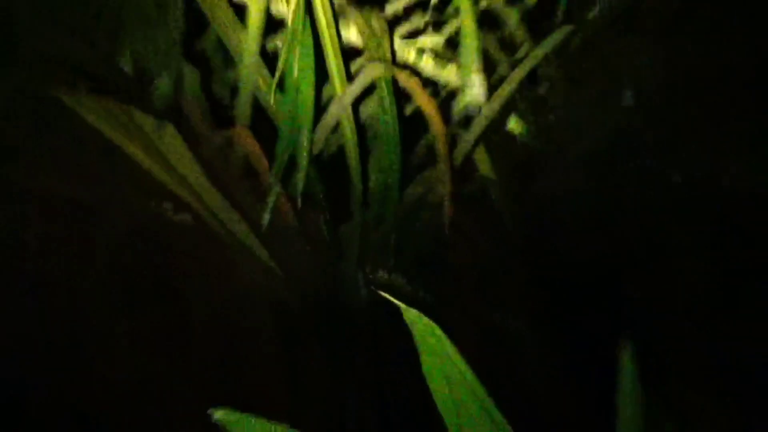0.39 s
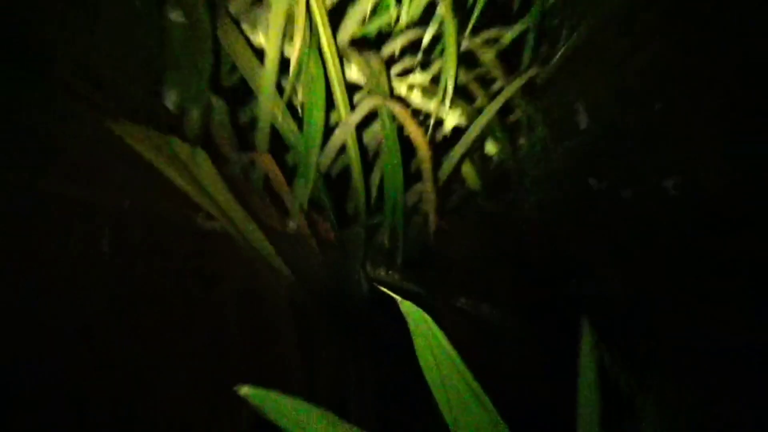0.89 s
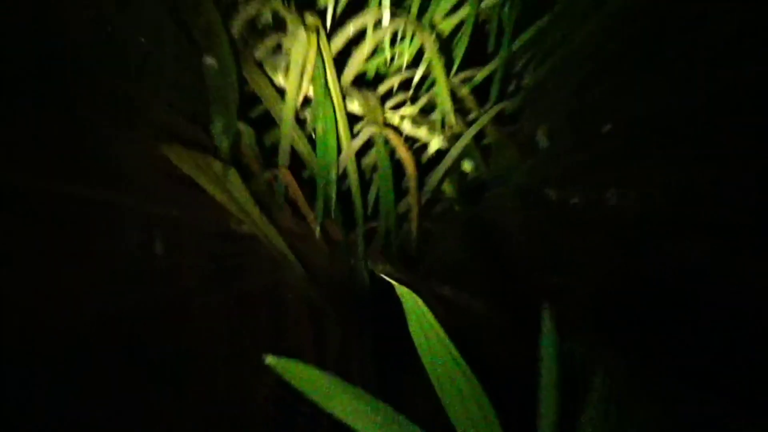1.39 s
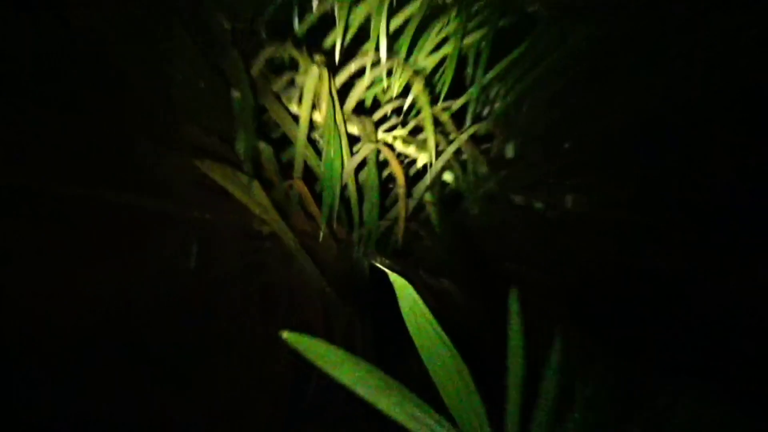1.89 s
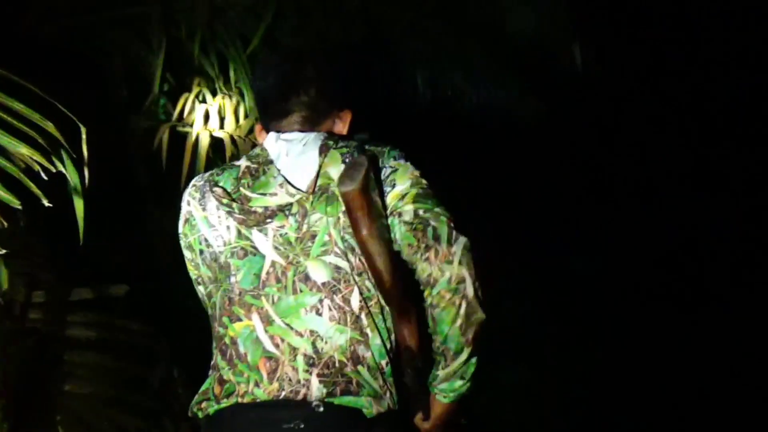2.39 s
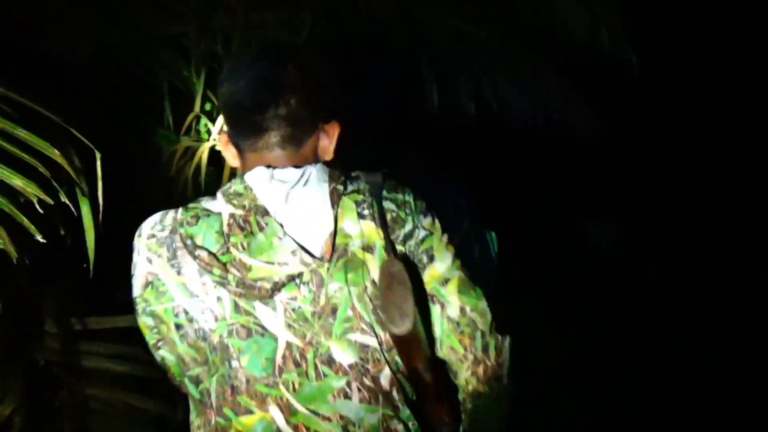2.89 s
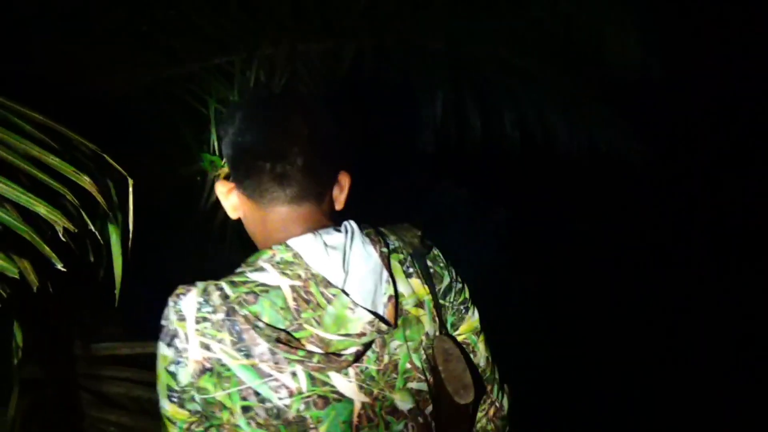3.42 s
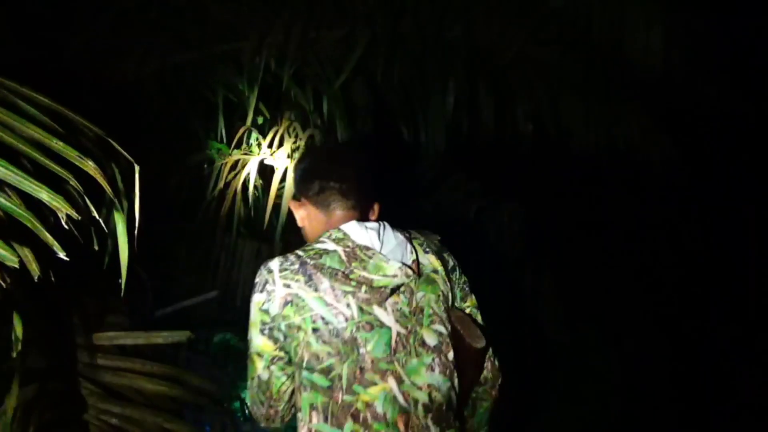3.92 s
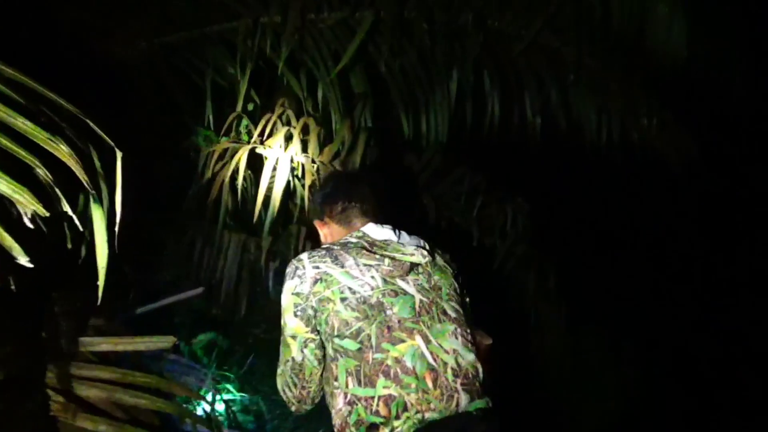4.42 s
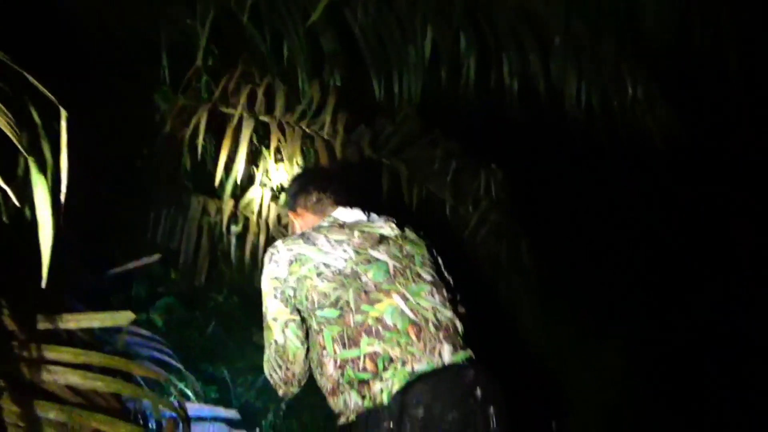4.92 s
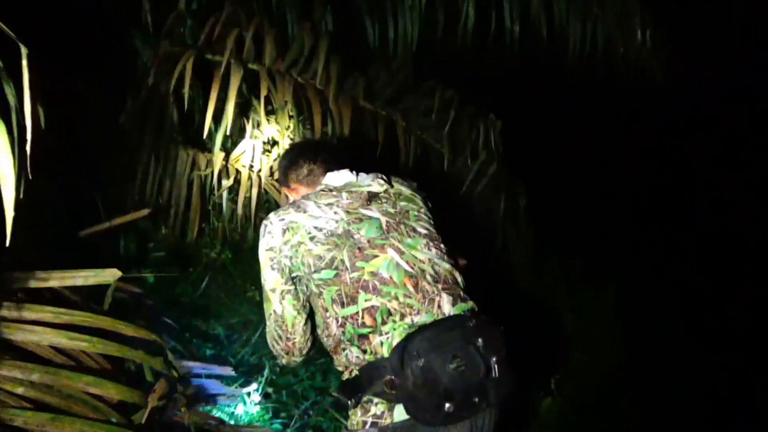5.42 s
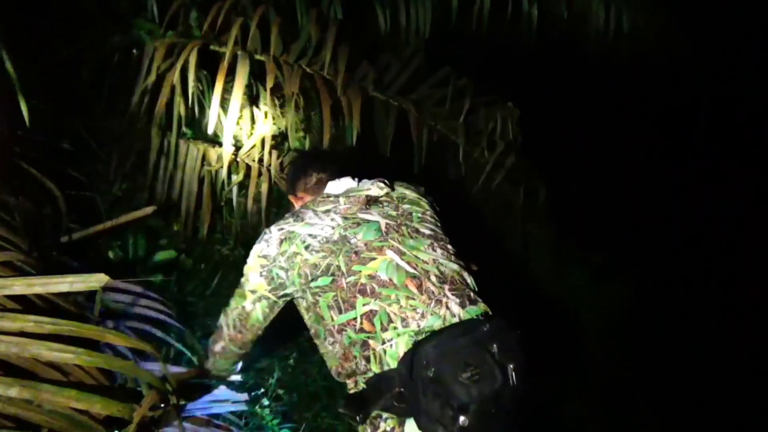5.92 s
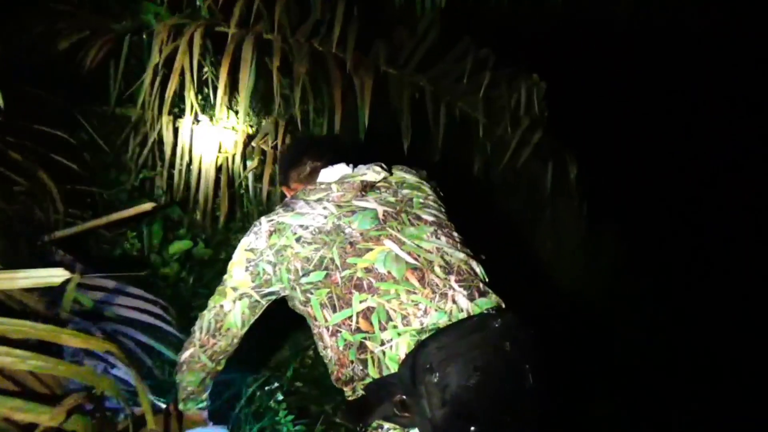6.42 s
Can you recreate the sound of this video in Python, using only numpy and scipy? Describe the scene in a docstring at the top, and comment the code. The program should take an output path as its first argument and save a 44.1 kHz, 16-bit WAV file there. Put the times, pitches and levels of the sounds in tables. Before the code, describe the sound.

A quiet spot in night foliage: faint insect bands, regular sliding trills about three per second, a light leaf swipe. Then a quick change to a loud, shrill insect chorus with steady chirps, quick lower strokes and brief raspy katydid buzzes. Someone moving through fronds makes gritty rustles and woody clicks, with low bumps on the close handheld stereo microphone.

```python
"""Night in a plantation, first from a quiet spot: banded noise for hiss and chorus, a bush cricket trilling in
short sliding tones, faint bumps, two katydid buzzes (harmonics of a tooth rate), then two rough falling calls.
After two seconds a much louder spot fades in: denser noise beds, crickets chirping as gated, resonant noise,
and short katydid bursts to the end. Gritty noise brushes through leaves close by; damped ringing modes knock
and a few low swings bump the stereo microphone."""
import sys
import numpy as np
from scipy import signal
from scipy.fft import rfft, irfft
from scipy.io import wavfile
from scipy.ndimage import uniform_filter1d

SR = 44100
rng = np.random.default_rng(int(sys.argv[2]) if len(sys.argv) > 2 else 0)


def ratio(d):
    """dB to gain"""
    e = np.asarray(d, float) / 20
    return 10 ** e


def unload_audio(sound):
    """Save the sound as a 16-bit wav file, at the path given as the first command line argument."""
    columns = np.transpose(np.atleast_2d(sound))
    # keep every value between -1 and 1, then stretch to whole-number steps
    steps = np.round(np.clip(columns, -1, 1) * 32767)
    wavfile.write(sys.argv[1], SR, steps.astype(np.int16))


N = 289296
T = np.arange(N) / SR
BIN_HZ = np.arange(N // 2 + 1) * SR / N


def unit(x):
    """Scale to rms 1."""
    return x / np.sqrt(np.mean(x ** 2))


def over_hz(table):
    """Gain at every spectrum bin, drawn through (Hz, dB) points on a log pitch axis."""
    hz, db = np.transpose(table)
    return ratio(np.interp(np.log(BIN_HZ + 1), np.log(hz), db))


def on_curve(rows):
    """Gain over time through (s, dB) rows, all but silent outside them."""
    s, db = np.transpose(rows)
    return ratio(np.interp(T, s, db, left=-99, right=-99))


def swells(rows):
    """Gain over time of bell-shaped (middle s, half length s, dB) rows."""
    return sum(ratio(db) * np.exp(-((T - middle) / half) ** 2) for middle, half, db in rows)


def even_run(first, count, gap, db, step_db, scatter_db):
    """(s, dB) rows of evenly spaced sounds, stepping in level and each a little louder or softer."""
    sizes = rng.standard_normal(count)
    return [(first + k * gap, db + k * step_db + scatter_db * size) for k, size in enumerate(sizes)]


def walk(rate):
    """Slow random wander, spread 1, with about `rate` fresh values a second."""
    k = int(SR / rate)
    steps = np.repeat(rng.standard_normal(N // k + 1), k)
    return unit(uniform_filter1d(uniform_filter1d(steps, k), k)[:N])


def wing(x, hz, width_hz):
    """A wing as a steep resonance: one damped mode passed three times, at rms 1."""
    off = (BIN_HZ - hz) / width_hz
    return unit(irfft(rfft(x) / (1 + 2j * off) ** 3, N))


# Side against mid of wide sounds. Each row: pitch in Hz, gain of the side in dB.
SIDE_GAIN = [(60, -24.5), (190, -10.5), (500, -3), (1100, -4.5), (3600, -9), (6500, -7.5), (11000, -13)]


def wide(mid, side):
    """Left and right from two unrelated sounds, the side shaped over pitch."""
    return mid + irfft(rfft(side) * over_hz(SIDE_GAIN), N) * np.array([[1], [-1]])


def panned(x, pan_db):
    """Place a sound by its level, left minus right in dB."""
    return x * ratio(np.array([[pan_db], [-pan_db]]) / 2)


def foliage(x, wet_db, t60):
    """Direct sound plus a decaying scatter from trunks and fronds, partly different at each ear."""
    t = T[:SR // 2]
    shared, left, right = rng.standard_normal((3, len(t))) * np.exp(-np.log(1000) * t / t60)
    tail = shared + 0.28 * np.array([left, right])
    tail = tail * ratio(wet_db) / np.sqrt(np.sum(tail ** 2, axis=1, keepdims=True))
    return x + signal.fftconvolve(x, tail, axes=1)[:, :N]


def air(shape, db, patchy_db):
    """Hiss of the night; countless faint singers come and go, so it is patchy in time and pitch."""
    pair = [irfft(rfft(rng.standard_normal(N)) * over_hz(shape), N) for _ in range(2)]
    cells = signal.stft(np.array(pair), nperseg=512)[2]
    patches = rng.standard_normal(cells.shape[1:])
    patches = uniform_filter1d(patches, size=2, axis=0)  # over pitch
    patches = unit(uniform_filter1d(patches, size=18, axis=1))  # over time
    mid, side = signal.istft(cells * ratio(patchy_db * patches), nperseg=512)[1][:, :N]
    return ratio(db) * unit(wide(mid, side))


def chorus(rows):
    """Far singers as bands of wing-filtered noise, each throbbing at a wandering rate and level."""
    out = 0
    for hz, width_hz, pulse_hz, db in rows:
        pair = []
        for _ in range(2):
            beat = np.cumsum(pulse_hz * (1 + .15 * walk(3))) / SR
            wander = ratio(0.4 * walk(11) + 0.27 * walk(1.906))
            throb = (1 + 0.16 * np.cos(2 * np.pi * beat)) * wander
            pair.append(throb * wing(rng.standard_normal(N), hz, width_hz))
        out = out + ratio(db) * wide(*pair)
    return out


# Swells of a slow singer. Each row: middle in seconds, half length in seconds, gain in dB.
SLOW_SWELLS = [(.16, .14, -42), (.56, .08, -46), (1.0, .08, -44), (1.41, .12, -44), (1.82, .11, -43)]


def slow_singer():
    """One band near 6.4 kHz opened by slow bells."""
    return swells(SLOW_SWELLS) * chorus([(6330, 750, 99, -1.9)])


# Tone of the quiet night air. Each row: pitch in Hz, relative density in dB per Hz.
QUIET_AIR_TONE = [(30, 0), (60, -1), (150, -1.5), (400, -9), (1200, -16), (2500, -8), (3300, 0),
                  (4350, -20), (5000, 0), (6000, 0), (8400, -5), (11000, -4)]
# Far singers at the quiet spot. Each row: wing pitch in Hz, width in Hz, mean pulse rate in Hz, gain in dB.
QUIET_SINGERS = [(10710, 1800, 400, -44), (5220, 1140, 30, -56), (7220, 1400, 35, -51.5),
                 (2300, 300, 13, -67)]


def quiet_bed():
    """Thin, patchy air with far bands and the slow singer."""
    return air(QUIET_AIR_TONE, db=-45.5, patchy_db=4.6) + chorus(QUIET_SINGERS) + slow_singer()


# Tone of the louder night air. Each row: pitch in Hz, relative density in dB per Hz.
LOUD_AIR_TONE = [(30, -15), (65, -2), (160, -1.5), (400, -7), (1200, -13.5), (2400, -9), (4300, -5.5),
                 (6000, -1), (8300, -3), (11000, -1.5)]
# Far singers at the loud spot. Each row: wing pitch in Hz, width in Hz, mean pulse rate in Hz, gain in dB.
LOUD_SINGERS = [(2300, 500, 50, -44), (2840, 110, 20, -45), (3100, 90, 30, -47), (7310, 120, 40, -43.5),
                (5170, 1050, 50, -33.5), (6300, 700, 60, -39)]


def loud_bed():
    """Fuller, smoother air with more bands of far singers."""
    return air(LOUD_AIR_TONE, db=-30, patchy_db=2.7) + chorus(LOUD_SINGERS)


# Move between the spots. Each row: time in seconds, quiet bed gain in dB, loud bed gain in dB.
SPOT_FADE = [(1.98, 5, -35), (2.05, 0, -5), (2.1, -10, -1), (2.16, -6, 4.5), (2.22, -40, 3.5)]


def beds():
    """The two spots joined by a short fade, each end of it held."""
    s, quiet_db, loud_db = np.transpose(SPOT_FADE)
    return ratio(np.interp(T, s, quiet_db)) * quiet_bed() + ratio(np.interp(T, s, loud_db)) * loud_bed()


# Treble at the loud spot. Each row: time in seconds, gain in dB.
TREBLE_GAIN = [(2.04, -45), (2.14, -33), (2.36, -29), (2.42, -37), (2.68, -30), (3.3, -34), (3.42, -27),
               (3.5, -30.5), (3.76, -32), (3.95, -24.5), (4.25, -39), (4.9, -36), (5.0, -31), (5.26, -30),
               (5.65, -38), (6.45, -36), (6.56, -29)]


def treble_hiss():
    """A thin hiss from one very broad band, riding up and down."""
    return on_curve(TREBLE_GAIN) * chorus([(9820, 7300, 31, 5.4)])


# Field crickets, one list for the quiet spot and one for the loud. Each row: time in seconds, gain in dB.
FIELD_GAIN = [
    [(0, -40), (.4, -41), (.8, -43), (1, -47), (1.3, -47), (1.5, -44), (2.05, -44.5), (2.15, -60)],
    [(1.99, -60), (2.09, -32), (2.22, -26), (2.9, -25), (3.3, -29), (3.6, -24.5), (4.05, -25), (4.3, -27),
     (4.9, -29.5), (5.2, -26), (5.6, -25), (5.9, -27), (6.2, -27), (6.4, -24.5), (6.56, -25)],
]
# One that stands out at the quiet spot. Each row: middle in seconds, half length in seconds, gain in dB.
FIELD_SOLO = [(.52, .03, -46), (.92, .035, -44), (1.06, .04, -42), (1.2, .04, -44), (1.41, .06, -46),
              (1.82, .03, -50)]


def field_crickets():
    """Two throbbing bands near 3.7 kHz at each spot, ridden in level."""
    quiet_gain = on_curve(FIELD_GAIN[0]) + swells(FIELD_SOLO)
    quiet = quiet_gain * chorus([(3593, 330, 57, -4.0), (3850, 260, 85, -5.0)])
    loud = on_curve(FIELD_GAIN[1]) * chorus([(3618, 390, 110, -4.5), (3809, 260, 34, -4.0)])
    return quiet + loud


# Bumps on the microphone. Each row: middle in seconds, level in dB, swing in Hz, length in seconds,
# share of rumble from 0 to 1.
MIC_BUMPS = [(.11, -40, 45, 0.052, 0.1), (.45, -43, 85, 0.038, .1), (.52, -37, 96, 0.037, .1),
             (2.225, -19, 230, 0.0048, 0.6), (2.245, -23, 131, 0.005, 0.46), (3.2, -34, 87.6, 0.015, 1),
             (6.51, -41, 40, .08, 0.5)]


def bumps():
    """Soft low pushes on the housing, alike on both channels: a swing plus its rumble."""
    out = 0
    low_pass = signal.butter(2, 450, fs=SR, output="sos")
    rumble = unit(signal.sosfilt(low_pass, rng.standard_normal(N)))
    for at, db, hz, length, share in MIC_BUMPS:
        t = T - at
        bell = np.exp(-(t / length) ** 2 * 4)
        out = out + ratio(db) * bell * (np.sin(2 * np.pi * hz * t) + share * rumble)
    return out


# Knocks of twigs and gear. Each row: start in seconds, level in dB, ring in Hz, ring time (60 dB) in seconds,
# contact time in seconds.
TWIG_KNOCKS = [(1.465, -39, 680, .04, .002), (2.359, -22, 1900, .012, .0004),
               (3.578, -23, 1950, .025, .0006), (4.322, -11, 1220, .06, .015),
               (4.866, -19, 1200, .04, .0005), (4.867, -21, 1480, .035, .001),
               (4.867, -21, 1800, .03, .0005), (5.16, -31, 660, .09, .01), (6.276, -28, 1700, .02, .0005)]


def knocks():
    """A push that rings one damped mode; the shorter the contact, the more crack."""
    out = np.zeros(N)
    t = T[:SR // 5]
    for at, db, hz, t60, contact in TWIG_KNOCKS:
        decay = np.exp(-np.log(1000) * t / t60)
        ring = np.sin(2 * np.pi * hz * t) * decay * (1 - np.exp(-t / contact))
        crack = 0.00023 / contact * rng.standard_normal(len(t)) * np.exp(-t / 0.0014)
        i = int(at * SR)
        out[i:i + len(t)] += ratio(db) * (ring + crack)
    return foliage(panned(out, -.5), wet_db=-7, t60=.07)


# Steady brushing. Each row: time in seconds, gain in dB.
BRUSHING = [(0.0, -50), (2.03, -55), (2.09, -38.5), (2.19, -30.5), (2.4, -36), (2.62, -40), (2.7, -34),
            (3.25, -33.5), (3.5, -30), (3.78, -32), (3.97, -27.5), (4.3, -44.5), (4.8, -40.5),
            (5.06, -33.5), (5.33, -29.5), (5.55, -39), (6.05, -51), (6.56, -39)]
# Single swipes of fronds. Each row: middle in seconds, half length in seconds, gain in dB.
FROND_SWIPES = [(1.41, .015, -44), (1.48, .02, -36), (2.36, .01, -35), (3.21, .02, -38), (3.43, .04, -38),
                (3.58, .015, -33), (3.985, .015, -32), (4.33, .01, -36), (4.51, .015, -36), (4.7, .06, -42),
                (4.875, .01, -33), (5.5, .025, -38), (6.165, .015, -36), (6.28, .03, -34), (6.52, .02, -42)]
# Tone of the leaves. Each row: pitch in Hz, relative density in dB per Hz.
LEAF_TONE = [(200, -16.5), (600, -3.5), (1500, -2.5), (3000, 2), (6000, -13), (9000, -1.5), (11000, -5.5)]


def leaves():
    """Dense crackle of fronds against cloth: noise whose grains vary widely in size."""
    grain_db = np.minimum(2.46 * rng.exponential(size=(2, N)), 22)
    grit = rng.standard_normal((2, N)) * ratio(grain_db)
    mid, side = (unit(irfft(rfft(g) * over_hz(LEAF_TONE), N)) for g in grit)
    return (on_curve(BRUSHING) + swells(FROND_SWIPES)) * wide(mid, side)


# Two short falling calls. Each row: start in seconds, from Hz, to Hz, length in seconds, gain in dB.
FALLING_CALLS = [(1.84, 4900, 4400, .06, -47), (1.975, 5000, 4350, .07, -42)]


def falling_calls():
    """A rough scrape whose pitch falls: a gliding tone roughened by slow noise."""
    out = np.zeros(N)
    for start, from_hz, to_hz, length, db in FALLING_CALLS:
        t = T[:int(length * SR)]
        glide_hz = from_hz + (to_hz - from_hz) * t / length
        tone = np.sin(2 * np.pi * np.cumsum(glide_hz) / SR)
        rough = unit(uniform_filter1d(rng.standard_normal(len(t)), size=100))
        i = int(start * SR)
        out[i:i + len(t)] = ratio(db) * np.sin(np.pi * t / length) * rough * tone
    return foliage(panned(out, 0), wet_db=1, t60=0.19)


def cricket(rows, hz, width_hz, length, pulse_hz, depth, pan_db):
    """Bell-shaped bursts of scraping through a wing resonance; inside a burst the strokes pulse."""
    gate = np.zeros(N)
    for at, db in rows:
        span = slice(int((at - 3 * length) * SR), int((at + 3 * length) * SR))
        t = T[span] - at
        gate[span] += ratio(db) * np.exp(-(t / length) ** 2) * (1 + depth * np.cos(2 * np.pi * pulse_hz * t))
    scrape = wing(rng.standard_normal(N), hz, width_hz)
    return foliage(panned(gate * scrape, pan_db), wet_db=-10, t60=.13)


# Phrases of the steady cricket. Each row: middle of first chirp in seconds, count of chirps, gap in seconds,
# mean gain of the first chirp in dB.
CHIRP_PHRASES = [(2.172, 7, .1302, -22.3), (3.082, 6, .1295, -21.5), (3.886, 5, .116, -22.5),
                 (4.513, 5, .117, -23), (5.132, 2, .138, -25.5), (5.427, 3, .123, -23.5),
                 (5.829, 3, .1215, -24.5), (6.22, 3, .1245, -23.5)]
# Strokes of the lower crickets. Each row: middle of first stroke in seconds, count of strokes,
# mean gain of the first stroke in dB.
STROKE_GROUPS = [(2.209, 4, -24), (2.421, 3, -23), (2.977, 2, -24.5), (3.152, 3, -23.5), (3.366, 3, -22),
                 (3.576, 3, -23.5), (3.789, 3, -23), (3.998, 2, -21.5), (4.168, 2, -24), (4.396, 2, -22),
                 (4.567, 3, -22), (4.777, 3, -22), (4.98, 3, -24), (5.095, 1, -27), (5.195, 3, -23.5),
                 (5.357, 2, -25), (5.445, 4, -24), (5.61, 3, -25.5), (5.737, 4, -25.5), (5.9, 1, -24),
                 (5.979, 1, -26), (6.038, 3, -24), (6.165, 4, -25), (6.385, 4, -22.5)]


def crickets():
    """Chirps in phrases, strokes in small groups with lone ones from farther off, and a thin even tick."""
    chirps, strokes = [], []
    for first, count, gap, db in CHIRP_PHRASES:
        chirps += even_run(first, count, gap, db, step_db=-.6, scatter_db=1.1)
    for first, count, db in STROKE_GROUPS:
        strokes += even_run(first, count, .0385, db, step_db=.2, scatter_db=1.1)
    waits, sizes = rng.exponential(size=(80, 2)).T
    stray_times = 2.1 + np.cumsum(waits) / 6  # about six a second
    strays = [(at, -33 - 3 * size) for at, size in zip(stray_times, sizes) if at < T[-1]]
    ticks = even_run(2.118, count=47, gap=.0959, db=-29.5, step_db=0, scatter_db=2.0)
    return (cricket(chirps, 6270, 970, length=0.033, pulse_hz=63.4, depth=0.2, pan_db=.5)
            + cricket(strokes + strays, 5143, 800, length=0.013, pulse_hz=90, depth=0.11, pan_db=0.96)
            + cricket(ticks, 7100, 840, length=0.016, pulse_hz=90, depth=.1, pan_db=1.0))


def bush_cricket():
    """Each trill at the quiet spot: a lone pulse, then quick pulses that slide down in pitch and die away."""
    out = np.zeros(N)
    t = np.arange(-.005, .005, 1 / SR)
    bell = np.exp(-(t / 0.0027) ** 2)
    for start, db in even_run(.233, count=6, gap=.3373, db=-27.5, step_db=0, scatter_db=.8):
        for k, (late, size) in enumerate(rng.standard_normal((12, 2))):
            # one pulse place is skipped after the first
            at = start + 0.0059 + .0063 * (k + (k > 0)) + 0.00089 * late
            hz = 7370 + 330 * np.exp(-(k / 3.1) ** 2) + 40 * size
            pulse_db = db - 0.13 * k ** 2 + 2.0 * size
            i = int(at * SR)
            out[i:i + len(t)] += ratio(pulse_db) * bell * np.sin(2 * np.pi * hz * t)
    return foliage(panned(out, 0.55), wet_db=-5, t60=.2)


# Katydid bursts. Each row: singer, start in seconds, length in seconds, tooth rate in Hz at full swell,
# wing pitch in Hz at the start, direct gain in dB before the swell.
KATYDID_BURSTS = [("quiet", .66, .2, 355.4, 9800, -38), ("quiet", .80, .28, 354.6, 10200, -40),
                  ("far", 2.275, .135, 368.6, 10100, -17), ("near", 2.27, .11, 364.7, 10500, -15.5),
                  ("near", 2.725, .11, 361.8, 9900, -11), ("far", 3.16, .065, 368.2, 10000, -18),
                  ("far", 3.19, .1, 367.2, 10200, -19), ("near", 3.33, .105, 361.8, 9900, -12.5),
                  ("far", 3.685, .095, 367.6, 10200, -25), ("far", 3.87, .15, 366.4, 9700, -18.5),
                  ("near", 4.06, .1, 362.7, 9800, -11), ("far", 4.25, .09, 368, 10200, -30),
                  ("far", 4.50, .1, 368.0, 10100, -29), ("near", 4.845, .115, 362.9, 10400, -9.5),
                  ("far", 4.995, .135, 370.7, 10200, -24), ("near", 5.285, .13, 360.4, 9800, -13),
                  ("far", 5.72, .115, 366.9, 9300, -17), ("near", 5.765, .12, 359.5, 9600, -12.5),
                  ("far", 6.17, .12, 368, 10200, -31)]
# Each singer by name: share of the burst spent swelling, wing pitch in Hz reached midway through the fall,
# left minus right in dB.
KATYDID_SINGERS = {"near": (.6, 10750, 3), "far": (.42, 10300, 0), "quiet": (.4, 9700, 1)}


def katydids():
    """A file of teeth struck at a barely slowing rate rings the wing: harmonics under a gliding resonance."""
    out = np.zeros((2, N))
    order = np.arange(23, 32)[:, None]
    for singer, start, length, rate_hz, from_hz, db in KATYDID_BURSTS:
        share, to_hz, pan_db = KATYDID_SINGERS[singer]
        full, end = start + share * length, start + length
        span = slice(int(start * SR), int(end * SR))
        t = T[span]
        swell = np.interp(t, [start, full, end - .02, end - .012, end], [0, 1, .55, .08, 0])
        swell = swell ** .7  # lifts the softer parts
        wing_hz = np.interp(t, [start, (full + end) / 2], [from_hz, to_hz])
        ring = 1 / (1 + 1j * (order * rate_hz - wing_hz) / 900) ** 4
        # paths through the leaves favour some harmonics, and the favour shifts during the burst
        first_db, last_db = 2.5 * rng.standard_normal((2, *order.shape))
        ring = ring * ratio(first_db + (last_db - first_db) * (t - start) / (end - start))
        phase = 2 * np.pi * np.cumsum(rate_hz * (1 - .02 * (t - full))) / SR
        buzz = unit(np.real(ring * np.exp(1j * order * phase)).sum(axis=0))
        out[:, span] += panned(ratio(db) * swell * buzz, pan_db)
    return foliage(out, wet_db=-8, t60=0.18)


def scene():
    """The beds of both spots, with every singer, brush, knock and bump on top."""
    background = beds() + treble_hiss() + field_crickets()
    handling = bumps() + knocks() + leaves()
    singers = falling_calls() + crickets() + bush_cricket() + katydids()
    return background + handling + singers


# Left port against the right. Each row: pitch in Hz, phase in radians.
LEFT_PHASE = [(0, -0.43), (690, -0.29), (1980, -0.66), (5510, -0.67), (7410, -0.46), (11800, -0.31)]


def microphone_ports(x):
    """The two ports differ a little in phase, by an amount that depends on pitch."""
    hz, lead = np.transpose(LEFT_PHASE)
    turn = np.exp(1j * np.interp(BIN_HZ, hz, lead))
    return np.array([irfft(rfft(x[0]) * turn, N), x[1]])


def top_cut(x):
    """Nothing passes above the cut-off."""
    return signal.sosfilt(signal.butter(12, 12270, fs=SR, output="sos"), x)


def record(dry):
    """The stereo microphone, with the top cut steeply near 11 kHz and peaks clipped at full scale."""
    ports = microphone_ports(dry)
    steep_cut = signal.ellip(12, .2, 75, 10960, fs=SR, output="sos")
    mix = np.clip(signal.sosfilt(steep_cut, ports), -1, 1)
    return top_cut(mix)


dry = scene()
out = record(dry)
unload_audio(out)
```